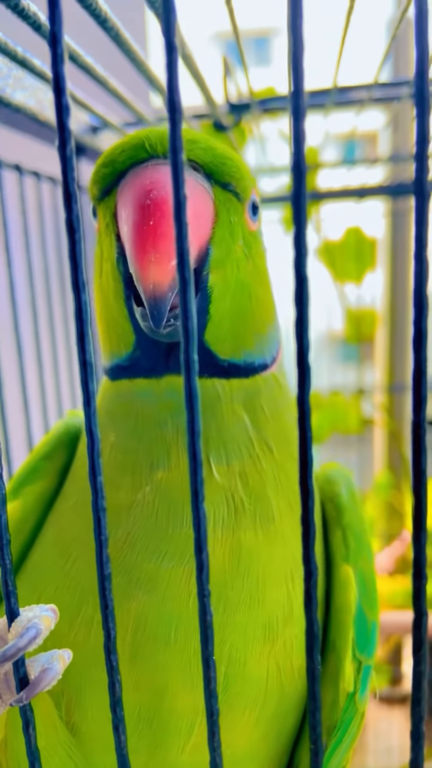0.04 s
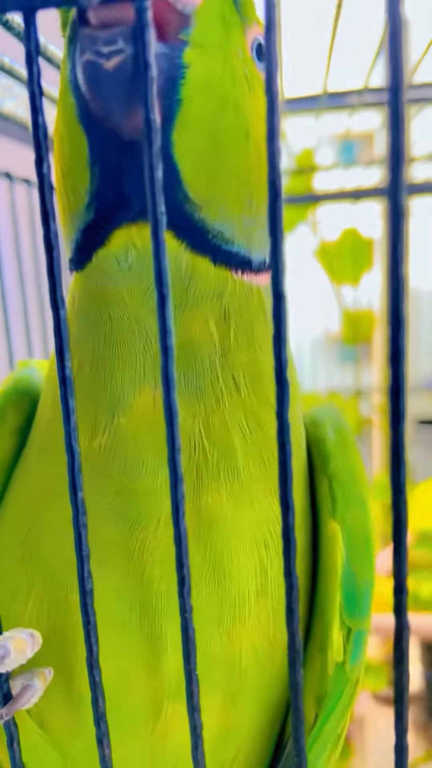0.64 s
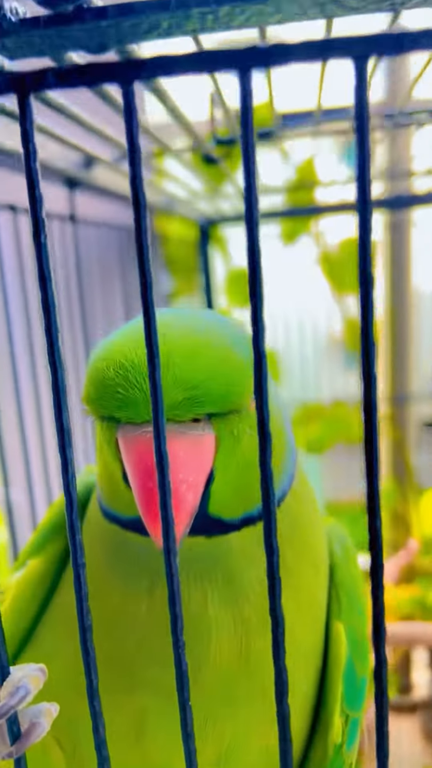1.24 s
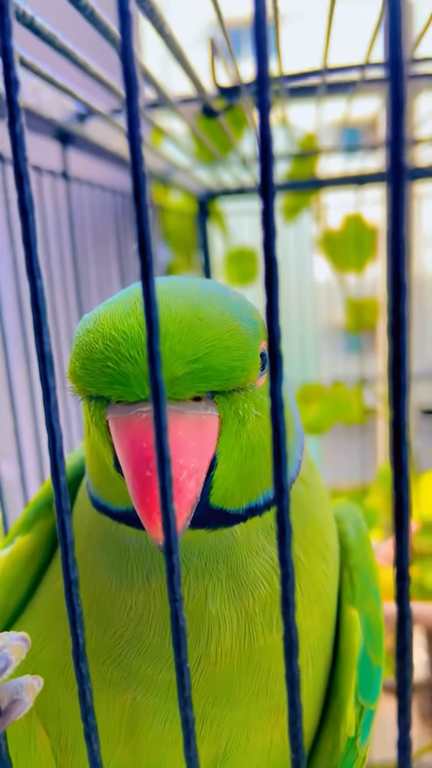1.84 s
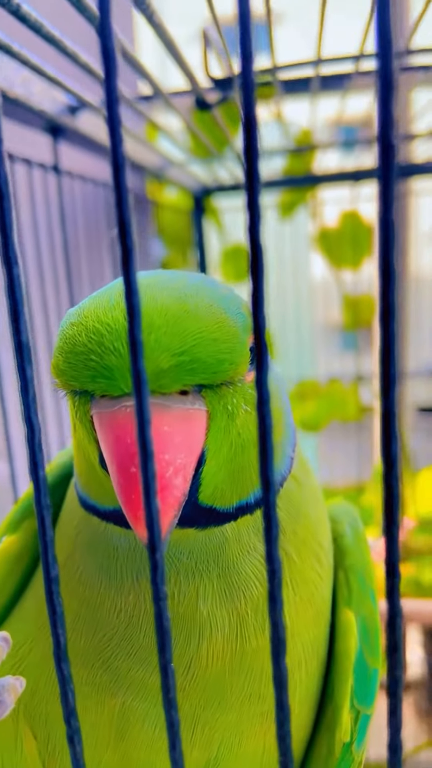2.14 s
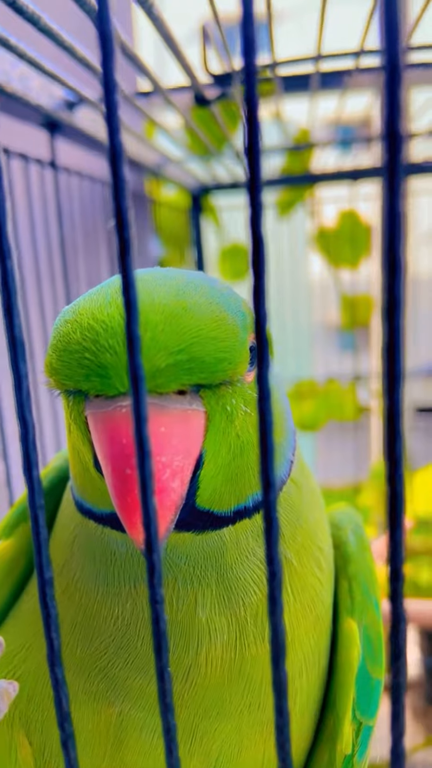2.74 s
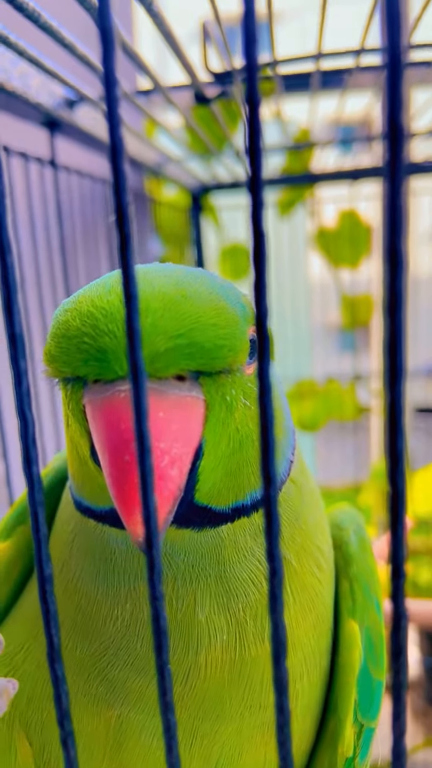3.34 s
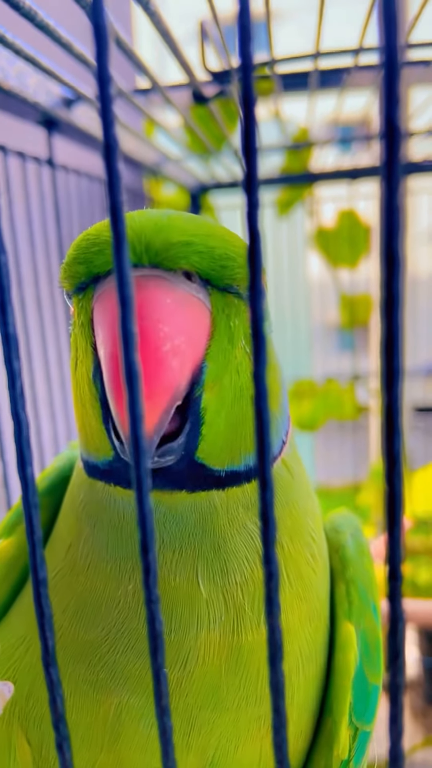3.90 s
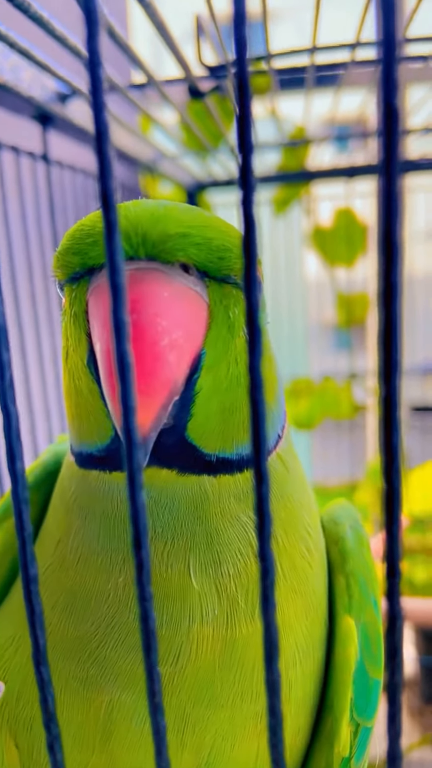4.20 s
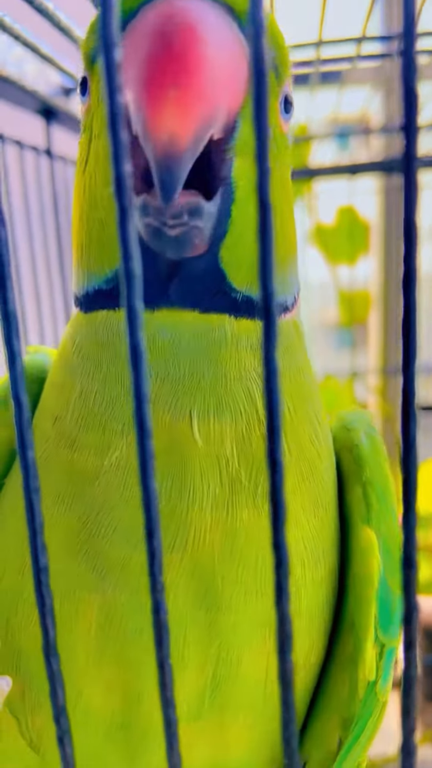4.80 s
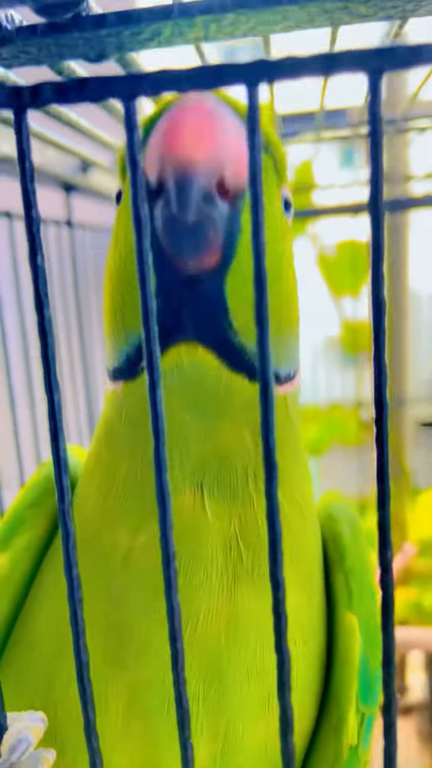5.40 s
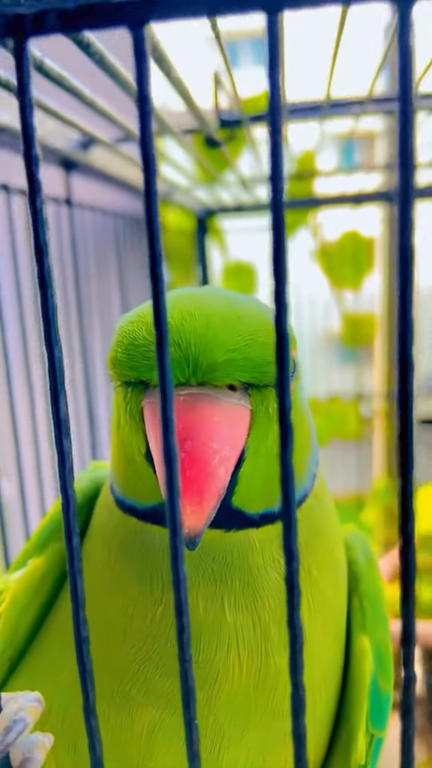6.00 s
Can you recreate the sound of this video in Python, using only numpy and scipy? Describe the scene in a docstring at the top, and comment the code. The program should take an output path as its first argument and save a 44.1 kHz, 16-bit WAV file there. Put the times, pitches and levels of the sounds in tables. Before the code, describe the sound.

In a small room with a faint low rumble, a parakeet close to the microphone gives a short and a longer piercing call, both sliding down. Crackly, popping kiss sounds repeat about three times a second over soft rustles and far-off chirps. One harsh screech rises and falls, followed by light beak clicks, a quick rattle and a soft peep. The bird repeats its pair of calls before three last smacks.

```python
"""A parakeet in a wire cage, close by in a small, faintly rumbling room. It opens with two shrill falling
calls, a buzzing syrinx shaped by throat and beak; the longer one breaks into a flutter as it sinks.
Kiss-like smacks follow, each a tick, a rising crackly squeeze and a pop, with faint far-off chirps and
soft rustles between. A screech arches up and down, then come dry beak ticks, a short rattle and a peep.
The pair of falling calls returns, and three more smacks close the scene."""
import sys
import numpy as np
from scipy import signal
from scipy.fft import rfft, irfft
from scipy.io import wavfile
from scipy.ndimage import uniform_filter1d

SR = 44100
rng = np.random.default_rng(int(sys.argv[2]) if len(sys.argv) > 2 else 0)


def dump_mix(stems):
    """Bounce the given channels to the path in sys.argv[1] as a 16-bit WAV at rate SR."""
    frames = np.atleast_2d(stems).T  # one column per channel
    limited = np.clip(frames, -1, 1)  # hard clip at full scale
    pcm = np.round(limited * 32767).astype(np.int16)
    wavfile.write(sys.argv[1], SR, pcm)


N = 271215
CUTOFF_HZ = 15900


def from_db(db):
    """Decibels to gain."""
    return 10 ** (np.asarray(db) / 20)


def rms_one(x):
    """Scale to unit power."""
    return x / np.sqrt(np.mean(x ** 2) + 1e-20)


def ramp(x):
    """Rise from 0 to 1 and stay there."""
    return np.clip(x, 0, 1)


def bell(x, width):
    """Bell curve of height 1 around zero."""
    return np.exp(-.5 * (x / width) ** 2)


def cycle(hz):
    """Running phase of a moving frequency."""
    return 2 * np.pi * np.cumsum(hz) / SR


def wander(count, rate_hz):
    """Smooth random modulation of unit power, up to the given rate."""
    low_pass = signal.butter(2, min(rate_hz, SR / 3), fs=SR, output="sos")
    return rms_one(signal.sosfilt(low_pass, rng.standard_normal(2 * count))[count:])


def at_hz(curve, hz):
    """Read an EQ curve in dB on a log-frequency axis."""
    freq_hz, db = np.transpose(curve)
    return np.interp(np.log(hz + 0.0014), np.log(freq_hz), db)


def colour(x, curve):
    """Minimum-phase EQ along the given curve."""
    size = 16384
    gain = from_db(at_hz(curve, np.fft.rfftfreq(size, 1 / SR)))
    cepstrum = irfft(np.log(gain))
    cepstrum[1:size // 2] *= 2
    cepstrum[size // 2 + 1:] = 0
    return signal.fftconvolve(x, irfft(np.exp(rfft(cepstrum))))[:len(x)]


def low_cut(x, hz):
    """Steep high-pass."""
    return signal.sosfilt(signal.butter(4, hz, "high", fs=SR, output="sos"), x)


def rumble(level_db=-47, low_cut_hz=46, sway_db=1.48):
    """Room tone: a bed of low noise whose level sways gently."""
    # room tone spectrum: freq_hz, level_db
    rumble_eq = [(15, 10), (25, -7), (70, 0.5), (175, -8.5), (223, -17), (439, -18), (516, -20),
                 (641, -16.5), (863, -24.5), (1290, -24.5), (1940, -27.5), (6560, -28.5), (7920, -36.5),
                 (13600, -35), (16000, -32.5)]
    bed = rms_one(low_cut(colour(rng.standard_normal(N), rumble_eq), low_cut_hz))
    return bed * from_db(level_db + sway_db * wander(N, 1.0))


def room(x, early_db=-11, early_t60_s=0.11, tail_db=-23, tail_t60_s=0.68):
    """Near surfaces echo at once, then the walls scatter a short tail."""
    # near reflections: delay_s, level_db
    echoes = [(.0023, -21.5), (.0053, -21.5), (.0087, -18.5)]
    # tone of the reverb: freq_hz, gain_db
    reverb_eq = [(300, -2.5), (1000, 6.5), (2600, -1), (5000, 5), (8000, 0), (16000, 1.5)]
    age = np.arange(int(.8 * SR)) / SR
    response = 0
    for db, t60 in [(early_db, early_t60_s), (tail_db, tail_t60_s)]:
        scatter = rng.standard_normal(len(age)) * from_db(-60 * age / t60) * ramp(age / 0.00072)
        response = response + from_db(db) * scatter / np.linalg.norm(scatter)
    response = colour(response, reverb_eq)
    for delay, db in echoes:
        response[int(delay * SR)] += from_db(db)
    return x + signal.fftconvolve(x, response)[:N]


def chirps(width_s=0.0045, waver=0.017):
    """Small birds far away: short wavering whistles."""
    # distant whistles: centre_s, pitch_hz, level_db
    whistles = [(.96, 6400, -52), (1.41, 7240, -54), (1.49, 4920, -56), (1.66, 5470, -48.5),
                (1.915, 7150, -49.5)]
    t = np.arange(N) / SR
    phase_per_hz = cycle(1 + waver * wander(N, 76))
    return sum(from_db(db) * bell(t - s, width_s) * np.sin(hz * phase_per_hz) for s, hz, db in whistles)


def rustles():
    """Soft bright swells of friction noise."""
    # rustle swells: centre_s, width_s, level_db
    swells = [(2.229, 0.047, -41), (2.835, 0.01, -41)]
    t = np.arange(N) / SR
    envelope = sum(from_db(db) * bell(t - s, width) for s, width, db in swells)
    friction = colour(rng.standard_normal(N), [(1000, -33), (5000, -16), (9000, 1), (14000, 12)])
    return envelope * rms_one(friction)


def beak_ticks(decay_s=0.0023, width_hz=1500):
    """Light dry ticks of the beak, each a brief band of noise."""
    # ticks: start_s, level_db, pitch_hz
    hits = [(2.89, -43, 13000), (3.971, -26.5, 8870), (3.992, -32, 6970), (4.008, -24.5, 13660),
            (4.311, -31, 2640), (5.616, -46, 6850)]
    out, age = np.zeros(N), np.arange(SR // 20) / SR
    for start, db, hz in hits:
        band = np.sin(2 * np.pi * hz * age) * wander(len(age), width_hz)
        i = int(start * SR)
        out[i:i + len(age)] += from_db(db) * np.exp(-age / decay_s) * band
    return out


def crackle(per_s, spread_db, hiss):
    """Tiny wet snaps of uneven size in a hiss of air."""
    snaps = (rng.random(N) < per_s / SR) * rng.choice([-1, 1], N)
    sizes = from_db(spread_db * np.minimum(rng.exponential(1, N), 4))
    return rms_one(rms_one(snaps * sizes) + hiss * rng.standard_normal(N))


def smacks(tick_decay_s=.001, climb_hz=3080, climb_s=.036, pop_rise_s=0.0058, fall_s=0.0051,
           crack_s=0.00032, crack_growth=1.6, usual_pop_db=-21, squeak_db=-43):
    """A seal parts with a tick, air crackles through as a small cavity shrinks and squeaks, then it pops."""
    # smacks: start_s, release_s, tick_db, squeeze_db, swell_db, pop_db, cavity_start_hz
    kisses = [(0.101, 0.129, -22, -22, 5, -33.5, 4306), (0.415, 0.461, -24, -19.5, 6, -23, 4187),
              (0.707, 0.769, -28.5, -29.5, 6, -21, 3226), (1.016, 1.075, -23.5, -27.5, 2.5, -18, 3900),
              (1.717, 1.787, -27, -22.5, 2, -23, 4394), (2.033, 2.088, -31, -27, 23, -19.5, 2790),
              (2.327, 2.388, -39, -22.5, 8, -21.5, 3313), (2.637, 2.695, -33, -28.5, 3.5, -22.5, 2585),
              (2.983, 3.055, -37, -27.5, 10.5, -22, 2392), (4.319, 4.385, -44, -21, 10, -21.5, 3304),
              (5.418, 5.475, -34.5, -25.5, 19, -20, 3700), (5.706, 5.751, -43, -26, 3, -20, 3510),
              (5.977, 6.018, -30, -21, 9, -19.5, 3310)]
    # tone of the tick and squeeze: freq_hz, gain_db
    squeeze_eq = [(500, -39), (1500, -13), (3500, -13), (6000, -4.5), (9000, -4), (12000, -6.5),
                  (15000, 4.5), (16500, -18)]
    # tone of the pop: freq_hz, gain_db
    pop_eq = [(150, -66), (400, -19), (900, -11), (2500, -6), (4500, -5), (7000, 4.5), (10000, -3.5),
              (13000, 2), (16500, -58)]
    t = np.arange(N) / SR
    tick, squeeze, pop, thup, squeak, cavity_hz, opening = np.zeros((7, N))
    for start, release, tick_db, squeeze_db, swell_db, pop_db, start_hz in kisses:
        i = slice(int(start * SR), int((release + 0.082) * SR))
        age, after = t[i] - t[i][0], t[i] - release
        progress = ramp(age / (release - start))
        cavity_hz[i] = start_hz + climb_hz * (1 - np.exp(-age / climb_s))
        opening[i] = ramp(after / 0.022 + .4)
        tick[i] = from_db(tick_db) * np.exp(-age / tick_decay_s)
        squeak[i] = np.interp(progress, [0, .2, .4, .8], [0, 1, 1, 0])
        contour_db = [-swell_db - 8.5, -swell_db, 0, (pop_db - squeeze_db) / 2]
        flow_db = squeeze_db + np.interp(progress, [0, .3, .7, 1], contour_db)
        squeeze[i] = from_db(flow_db) * np.exp(-np.maximum(after, 0) / fall_s)
        attack = np.exp(np.minimum((after + 0.0023) / pop_rise_s, 0))
        decay = np.exp(-np.maximum(after - .002, 0) / fall_s)
        # the release is a crack, far sharper in a hard pop
        crack_db = pop_db + crack_growth * (pop_db - usual_pop_db)
        crack = from_db(crack_db) * (after >= 0) * np.exp(-np.abs(after) / crack_s)
        pop[i] = from_db(pop_db) * attack * decay + crack
        thup[i] = from_db(pop_db) * bell(after - .003, 0.0036)
    click = from_db(7) * tick * rng.standard_normal(N)
    fizz = from_db(1) * squeeze * crackle(per_s=2500, spread_db=4.0, hiss=0.54)
    burst = from_db(.5) * pop * crackle(per_s=4600, spread_db=5.5, hiss=1.0)
    # a clear squeak at first, breaking up into a noisy whistle
    whistle = from_db(squeak_db) * squeak * (1 + 0.74 * wander(N, 280))
    whistle += from_db(-8) * squeeze * wander(N, 400)
    whistle *= np.sin(cycle(cavity_hz * (1 + 0.05 * wander(N, 640))))
    # the cavity's note drops as it opens
    hollow = from_db(-14) * thup * np.sin(cycle(2400 * 0.36 ** opening)) * wander(N, 900)
    stray_snaps = from_db(-6) * squeeze * crackle(per_s=160, spread_db=1.7, hiss=.05)
    return colour(click + fizz + stray_snaps, squeeze_eq) + colour(burst, pop_eq) + whistle + hollow


def rattle(start_s=4.3686, count=6, flicks_per_s=73, flick_s=.0044, low_hz=1200, high_hz=4700,
           level_db=-4, crest_s=.027, crest_width_s=0.033, ring_db=-13, ring_decay_s=.006):
    """The syrinx opens in brief bursts, each sweeping quickly upward and leaving the throat ringing."""
    # the throat's ring after each flick: freq_hz, gain_db
    ring_eq = [(600, -40), (1200, -31), (1800, -9), (2600, 12), (3700, 7), (5200, 15), (6500, 1), (9000, 5),
               (12000, -33)]
    out, age = np.zeros(N), np.arange(SR // 30) / SR
    for delay in np.arange(count) / flicks_per_s:
        length = flick_s * (1 + 0.24 * rng.uniform(-1.05, 1))
        progress = ramp(age / length)
        sweep_hz = low_hz + (high_hz - low_hz) * progress
        phase = cycle(sweep_hz * (1 + .11 * wander(len(age), 1700)))
        envelope = 2.47 * progress ** 0.81 * np.sqrt(1 - progress)
        shudder = 1 + 0.36 * wander(len(age), 700)
        flick = envelope * shudder * (np.sin(phase) + from_db(-17) * np.sin(2 * phase))
        ring = from_db(ring_db) * rms_one(colour(rng.standard_normal(len(age)), ring_eq))
        ring *= progress * np.exp(-np.maximum(age - length, 0) / ring_decay_s)
        accent = from_db(level_db) * bell(delay - crest_s, crest_width_s)
        i = int((start_s + delay) * SR)
        out[i:i + len(age)] += accent * (flick + ring)
    # so small a throat radiates no bass
    return low_cut(out, 1150)


def note_times(start, end):
    """Sample times of a note and its release."""
    return np.arange(max(int(start * SR), 0), int((end + .06) * SR)) / SR


def mix_harmonics(gains, waves):
    """Sum harmonics at a steady power, whatever their balance."""
    power = uniform_filter1d((gains ** 2).sum(0), size=400) / 2
    return (gains * waves).sum(0) / np.sqrt(power + 1e-9)


def syrinx(t, end, pitch, level_db, bright_db, beak_hz, beak_db, rough, strain=0,
           flutter_hz=90.3, flutter_swing=0.068, flicker=0.64, hiss=0.36, beak_width_hz=420,
           dull_db=0, fundamental_db=0, attack_s=0.0015, release_s=0.0022):
    """The syrinx buzzes at an unsteady pitch; its harmonics slide through throat and beak resonances."""
    # throat resonances, the body of the voice: freq_hz, gain_db
    throat_eq = [(400, -15), (600, -8), (850, -12), (1300, -11), (1700, -7.5), (2200, -3.5), (2650, -0.5),
                 (3200, -3.5), (3800, -10.5), (4500, -14), (5300, -17.5), (6200, -14)]
    # high overtones, its bright edge: freq_hz, gain_db
    edge_eq = [(6000, -1.5), (7200, 11), (8400, 11), (9400, 0.5), (11000, 15.5), (12700, 0), (14200, 10.5),
               (16000, -1)]
    # rasp of air in a rough note: freq_hz, gain_db
    rasp_eq = [(900, -46), (1800, -3), (2600, 0.5), (3400, 10), (4400, -12), (5300, 17), (6200, -14),
               (12000, -25)]
    count, rough = len(t), ramp(rough)
    depth = flutter_swing * strain * (1 + 0.3 * wander(count, 56))
    flutter = depth * np.sin(cycle(flutter_hz * (1 + .15 * wander(count, 65))))
    jitter = (0.0027 + 0.02 * rough) * wander(count, 800)
    pitch = pitch * (1 + flutter) * (1 + jitter)
    harmonics = np.arange(1, 36)[:, None]
    hz = harmonics * np.abs(pitch)
    # the higher a harmonic, the less steadily it keeps step with the rest
    slip_depth = flicker * np.sqrt(rough) * np.minimum(hz / 6000, 1.3) ** 2
    slip = slip_depth * np.array([wander(count, 260) for _ in harmonics])
    waves = np.sin(harmonics * cycle(pitch) + slip + rng.uniform(0, 2 * np.pi, harmonics.shape))
    crossover = ramp((hz - 5700) / 600)
    beak = beak_db * bell(hz - beak_hz, beak_width_hz)
    # in the flutter the throat tightens onto one piercing resonance and the fundamental grows
    focus = 6 * strain * bell(hz - 2620, 300)
    root = (fundamental_db + 4 * strain) * (harmonics == 1)
    body_gains = (1 - crossover) * from_db(at_hz(throat_eq, hz) + beak + focus + root)
    # soft or strained notes lose their highest overtones
    db_per_octave = dull_db + 0.34 * (-14 - level_db) + 5 * strain
    sparkle_db = 4.2 * np.array([wander(count, 38) for _ in harmonics])
    edge_db = at_hz(edge_eq, hz) - db_per_octave * np.log2(hz / 6000) + sparkle_db
    edge_gains = crossover * (hz < CUTOFF_HZ) * from_db(edge_db)
    # air escapes in a puff on each cycle
    puffs = rng.standard_normal(count) * (1 + np.cos(cycle(pitch)))
    rasp = from_db(-10) * rough * rms_one(colour(puffs, rasp_eq))
    breath = hiss * rough * rms_one(colour(puffs, [(4500, -22)] + edge_eq))
    body = mix_harmonics(body_gains, waves) + rasp
    edge = mix_harmonics(edge_gains, waves) + breath
    shimmer = from_db(-0.67 * wander(count, 100))
    gate = ramp((t - t[0]) / attack_s) * np.exp(-np.maximum(t - end, 0) / release_s)
    out = np.zeros(N)
    out[np.rint(t * SR).astype(int)] = (body + from_db(bright_db) * edge) * shimmer * gate * from_db(level_db)
    return out


def peep(start_s=4.519, end_s=4.588, pitch_hz=1283.5, upturn_s=.021, upturn_hz=195):
    """A soft clean note that holds its pitch, then swells and loses its overtones as it turns up."""
    t = note_times(start_s, end_s)
    onset = ramp(1 - (t - start_s) / .014)
    turn = ramp(1 + (t - end_s) / upturn_s)
    level_db = -21 - 6 * onset + 4.5 * bell(turn - .52, 0.22) - 4 * turn ** 3
    closing_db = 16 * ramp(2 * turn)
    return syrinx(t, end_s, pitch_hz + upturn_hz * turn, level_db, bright_db=-19 - closing_db,
                  beak_hz=5000, beak_db=7 - closing_db, beak_width_hz=650, rough=0.011, dull_db=22)


def screech(pure_from_hz=1060, pure_over_hz=170, rough_below_hz=340, burst_s=.015):
    """A harsh burst that clears as the pitch climbs, is purest at the top and coarsens on the way down."""
    # arch of the screech: time_s, pitch_hz, level_db
    arch = [(3.632, 605.5, -10), (3.648, 788, -11.5), (3.662, 914, -12.5), (3.69, 1093, -16.5),
            (3.738, 1245, -11.5), (3.782, 1023, -16), (3.834, 688.4, -16), (3.882, 548.4, -20),
            (3.917, 431.4, -27.5)]
    times, hz, db = np.transpose(arch)
    t = note_times(times[0], times[-1])
    pitch = uniform_filter1d(np.interp(t, times, hz), size=700, mode="nearest")
    pure = ramp((pitch - pure_from_hz) / pure_over_hz)
    rough = rough_below_hz / pitch * (1 - 0.59 * pure) + np.exp(-(t - times[0]) / burst_s)
    # at the top the beak resonance is lower and milder, and the fundamental thins
    beak_hz, beak_db = 4550 - 700 * pure, 13 - 7 * pure
    fundamental_db = 3.5 - 7.5 * ramp((pitch - 700) / 500)
    bright_db = -7 - 7 * pure
    return syrinx(t, times[-1], pitch, np.interp(t, times, db), bright_db, beak_hz, beak_db, rough,
                  hiss=.5, flicker=.55, attack_s=.003, beak_width_hz=600, fundamental_db=fundamental_db)


def falling_calls(flutter_below_hz=906, flutter_onset_hz=26.7, bloom_hz=1010, rise_s=0.014, fade_s=0.042,
                  sag_db_per_s=10.5, dull_db_per_s=46.5, catch_s=0.016):
    """Shrill calls: the beak resonance sinks with the pitch, and the long ones end in a rough flutter."""
    # calls in short-long pairs: start_s, end_s, level_db, top_hz, low_hz, sink_s
    cries = [(-0.024, 0.063, -13, 1128, 906, .039), (0.142, 0.337, -13.5, 1109, 843.5, 0.057),
             (4.661, 4.743, -12.5, 1114, 911.6, .042), (4.824, 5.029, -14, 1115, 839.7, 0.063)]
    out = np.zeros(N)
    for start, end, db, top_hz, low_hz, sink_s in cries:
        t = note_times(start, end)
        age = t - start
        s_curve = np.exp(-np.abs(age / sink_s) ** 1.8)
        pitch = low_hz + (top_hz - low_hz) * s_curve
        strain = ramp((flutter_below_hz - pitch) / flutter_onset_hz)
        onset, fading = ramp(1 - age / rise_s), ramp(1 + (t - end) / fade_s)
        # the call blooms as its pitch passes the throat's best note
        bloom = bell(pitch - bloom_hz, 25)
        level_db = db - 7 * onset + 1.5 * bloom - sag_db_per_s * age - 11.5 * fading ** 2
        bright_db = -7 - dull_db_per_s * age
        beak_hz = 5000 + 4.8 * (pitch - bloom_hz)
        beak_db = 11 + 7 * bloom - 6 * ramp((age - .11) / 0.21)
        # the voice catches roughly before it settles
        rough = 0.19 + 0.26 * np.exp(-age / catch_s) + 0.38 * strain
        out += syrinx(t, end, pitch, level_db, bright_db, beak_hz, beak_db, rough, strain)
    return out


def scene(voice_db=-1):
    """The parakeet and the distant chirps share the room's reverb, over the rumble."""
    voice = from_db(voice_db) * (falling_calls() + screech() + peep())
    parakeet = voice + rattle() + smacks() + beak_ticks() + rustles()
    bed = rumble()
    return (room(parakeet + chirps()) + bed)[None]


def record(dry):
    """Peaks clip at full scale and a steep low-pass trims the top."""
    low_pass = signal.ellip(10, .1, 70, CUTOFF_HZ, fs=SR, output="sos")
    return signal.sosfilt(low_pass, np.clip(dry, -1, 1))


dry = scene()
out = record(dry)
dump_mix(out)
```